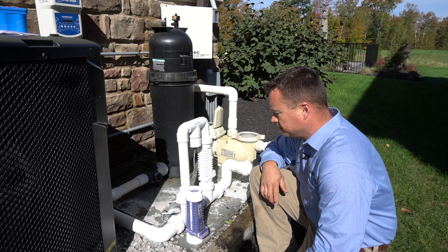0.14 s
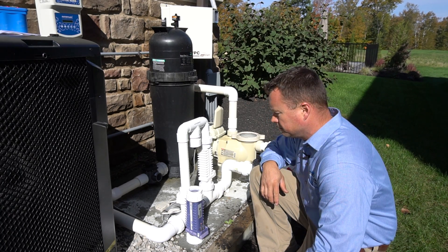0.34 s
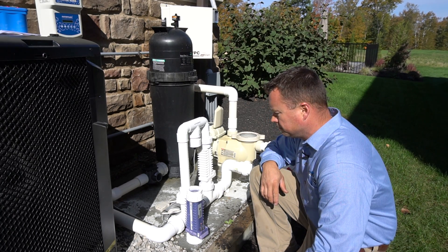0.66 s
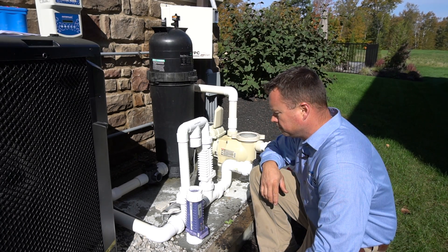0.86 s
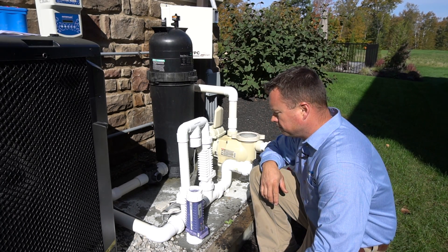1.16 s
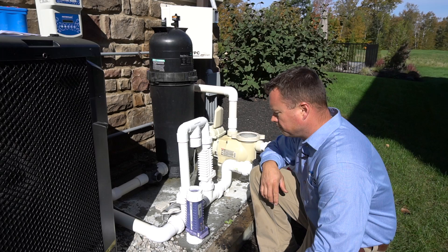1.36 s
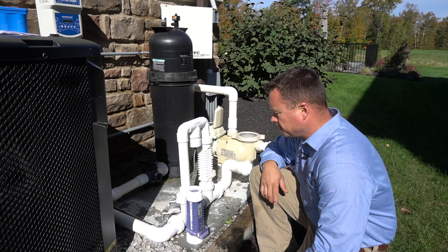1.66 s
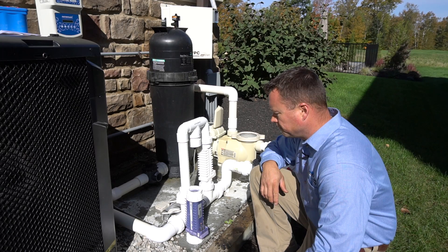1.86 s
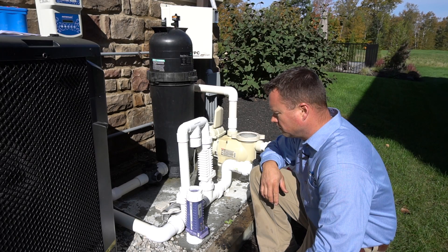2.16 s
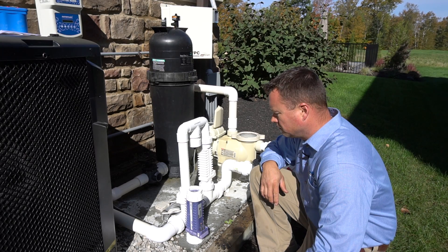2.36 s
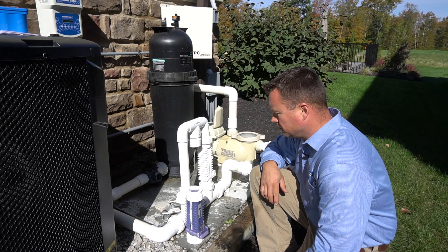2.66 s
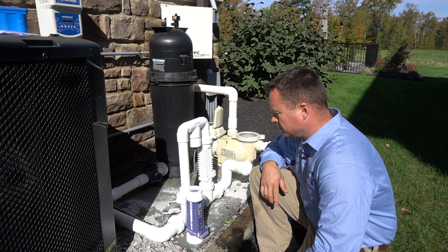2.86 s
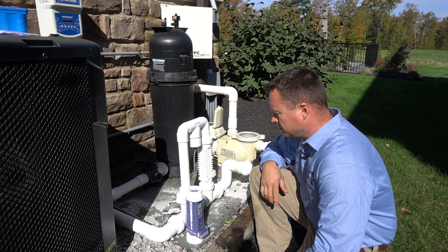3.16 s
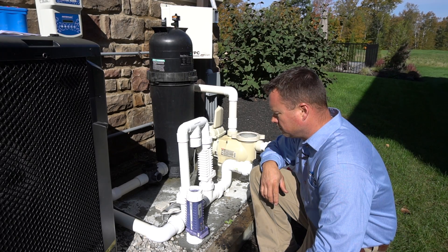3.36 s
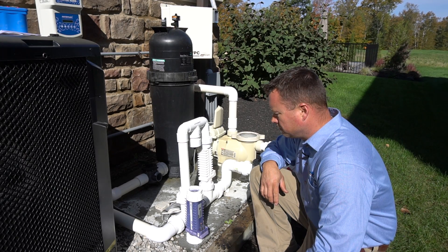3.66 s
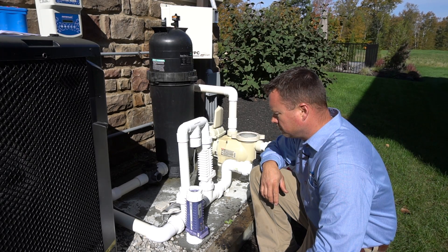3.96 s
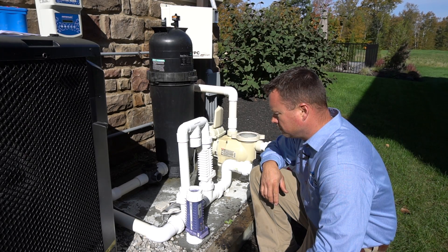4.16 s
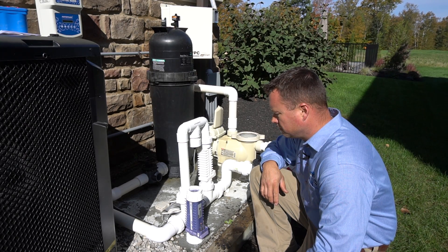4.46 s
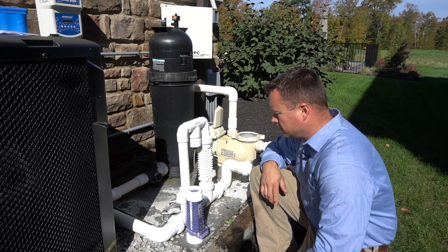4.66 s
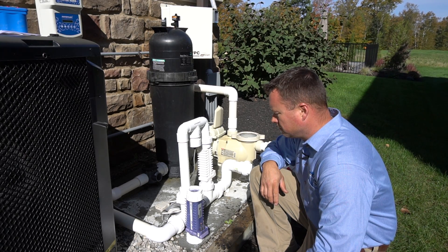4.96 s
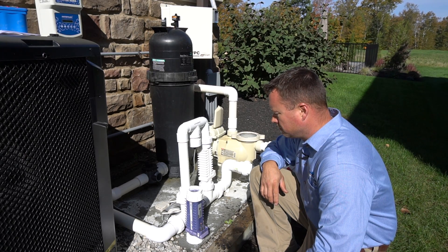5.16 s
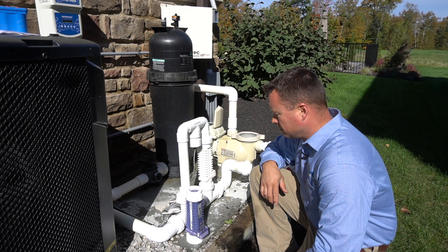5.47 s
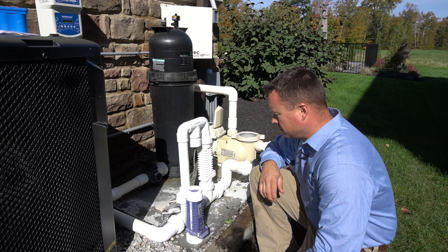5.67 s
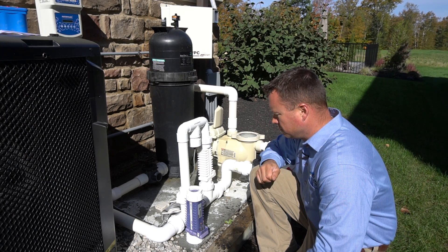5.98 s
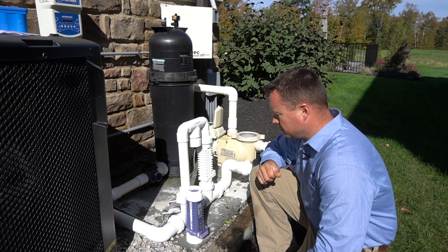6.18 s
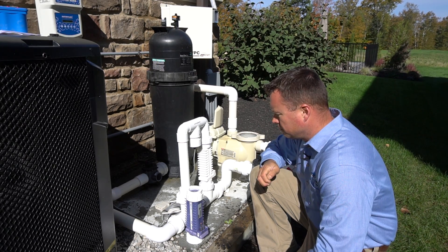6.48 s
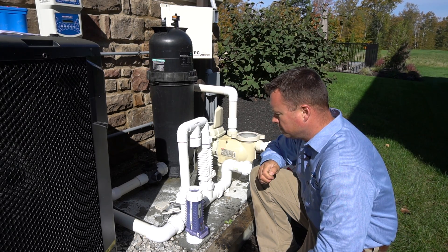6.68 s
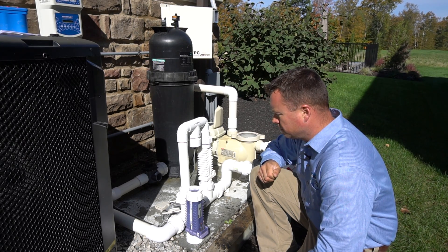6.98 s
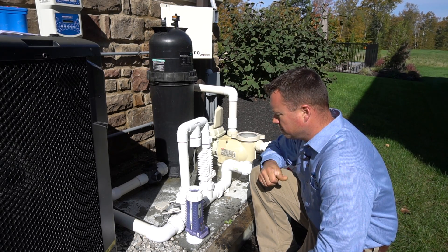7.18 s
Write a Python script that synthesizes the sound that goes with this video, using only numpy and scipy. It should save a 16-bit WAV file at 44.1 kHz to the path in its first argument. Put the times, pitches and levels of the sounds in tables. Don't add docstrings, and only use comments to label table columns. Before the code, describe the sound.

From 0 s a pool pump is already running outdoors beside a stone wall, fairly quiet at first. Its drone is steady in pitch: strong tones at about 290, 590 and 650 Hz, with higher whining overtones and a slight rough buzz from uneven rotation. Around them, turbulent water rushes with a hollow ring of housing and pipes, plus a fine continuous fizz of bubbles. A weak electrical hum lies below and a very faint, slowly wavering whistle near 14.5 kHz above. The level rises smoothly, about 1.5 dB per second, reaching roughly 11 dB louder near 7 s, then holding. Light wind makes low, muffled bumps on the microphone from about 1.5 s, clustered around 2.2-2.7, 3.3-4 and 4.7-5.9 s, milder near 6.5 s, strongest just after 7 s. The pump never starts, stops or changes speed.

```python
import sys
import numpy as np
from scipy import signal
from scipy.fft import rfft, irfft, next_fast_len
from scipy.io import wavfile
from scipy.ndimage import uniform_filter1d, map_coordinates

SR = 44100
rng = np.random.default_rng(int(sys.argv[2]) if len(sys.argv) > 2 else 0)


def transcribe(u):
    v = np.clip(np.atleast_2d(u).T, -1, 1)
    q = np.round(v * 32767).astype(np.int16)
    wavfile.write(sys.argv[1], SR, q)


def makeup_ratio(level_db):
    decades = np.asarray(level_db, float) / 20
    return 10 ** decades


N = 323253


def unit(x):
    return x / np.sqrt(np.mean(x ** 2) + 1e-20)


def along(points, hz):
    f, db = np.transpose(points)
    return makeup_ratio(np.interp(np.log(hz + 1), np.log(f + 1), db))


def wobble(rate):
    coarse = np.arange(0, N + 64, 64)
    knots = rng.standard_normal(int(N * rate / SR) + 4)
    curve = map_coordinates(knots, [coarse * rate / SR])
    return np.interp(np.arange(N), coarse, curve)


def swing(depth_db, period_s, crest_s):
    return depth_db * np.cos(2 * np.pi * (np.arange(N) / SR - crest_s) / period_s)


def coloured(x, gain):
    m = next_fast_len(N + 8192)
    spectrum = rfft(x, m) * gain(np.fft.rfftfreq(m, 1 / SR))
    return irfft(spectrum, m)[:N] * np.sqrt(SR / 2)


def patchy(patchy_db):
    z = signal.stft(rng.standard_normal(N + 512), nperseg=512)[2]
    field = uniform_filter1d(rng.standard_normal(z.shape), size=6, axis=0)
    field = uniform_filter1d(field, size=14, axis=1)
    noise = signal.istft(z * makeup_ratio(patchy_db * unit(field)), nperseg=512)[1]
    return unit(noise[:N])


def tones(angles, levels_db, sway_db, rate):
    total, n = np.zeros(N), np.arange(N)
    for angle, db in zip(angles, levels_db):
        level_db = db + sway_db * wobble(rate)
        envelope = np.interp(n, n[::64], makeup_ratio(level_db[::64]))
        total += envelope * np.sqrt(2) * np.sin(angle)
    return total


def wind():
    # (start of hold [s], peak level [dB], hold [s])
    gust_events = [(1.55, -54, .15), (2.25, -47, .06), (2.69, -46, .04), (2.9, -57, .05), (3.33, -47, .06),
                   (3.77, -46, .03), (3.96, -44, .06), (4.75, -47, .1), (4.98, -45.5, .05),
                   (5.27, -44, .05), (5.45, -49, .12), (5.702, -46, 0.18), (6.43, -50, 0.11),
                   (6.7, -52, 0.14), (7.07, -42, .17)]
    # (frequency [Hz], level [dB])
    buffet_colour = [(4, -30), (12, -8), (22, -3.5), (40, 0.5), (65, -4.5), (90, -8), (200, -24),
                     (500, -60)]
    breeze_db = -56
    rise_s, fall_s = 0.041, 0.073
    t = np.arange(N) / SR
    strength = makeup_ratio(breeze_db)
    for start, db, hold in gust_events:
        rise = (t - start) / rise_s
        fall = (start + hold - t) / fall_s
        strength = strength + makeup_ratio(db) * np.exp(np.minimum(0, np.minimum(rise, fall)))
    buffeting = coloured(rng.standard_normal(N), lambda f: along(buffet_colour, f))
    return strength * unit(makeup_ratio(1.4 * wobble(8)) * buffeting)


def drive():
    # (frequency [Hz], rms level [dB])
    hum_tones = [
        (35, -58),
        (94.2, -60),
        (120.5, -60),
        (58.7, -62),
    ]
    # (offset from carrier [ripple steps], rms level [dB])
    whistle_lines = [(-13.63, -88), (-5.35, -90), (-5, -89), (-3, -91), (-1.48, -94), (0, -78), (1, -81),
                     (3, -84), (5, -90), (6, -92), (7.35, -94)]
    # (offset [ripple steps], rms level [dB], swing [dB], period [s], crest [s])
    beat_lines = [
        (-4, -80, 1.5, 13, 6),
        (-2, -82, 8, 4.9, .1),
        (-1, -89, 7, 13, 6.3),
        (2, -76, 2.5, 5.5, 1.5),
    ]
    carrier_hz, ripple_hz = 14494.1, 120.6
    t = 2 * np.pi * np.arange(N) / SR

    def sideband(k):
        return (carrier_hz + k * ripple_hz) * t + rng.uniform(0, 2 * np.pi)

    hum = tones((hz * t for hz, _ in hum_tones), [db for _, db in hum_tones], sway_db=3.0, rate=2.47)
    steady = tones((sideband(k) for k, _ in whistle_lines), [db for _, db in whistle_lines],
                   sway_db=1.2, rate=.9)
    beating_db = [db + swing(*beat) for _, db, *beat in beat_lines]
    beating = tones((sideband(round(row[0])) for row in beat_lines), beating_db, sway_db=2.0, rate=3.04)
    return hum + steady + beating


def water():
    # (frequency [Hz], width [Hz], density [dB per Hz])
    housing_modes = [(250, 60, -72), (353, 68, -66), (531, 124, -63.5), (632, 55, -69), (811.5, 105, -61),
                     (927, 110, -69.5), (1050, 50, -66.5), (1226, 58, -64), (1280, 65, -68),
                     (1530, 29, -73), (1748, 110, -72), (1890, 58, -78), (1940, 63, -69), (2043, 140, -74),
                     (2420, 450, -81.5), (3035, 126, -82.5), (3450, 88, -82.5), (3566, 57, -83.5),
                     (3800, 82, -90.5), (4430, 150, -89), (5210, 140, -91), (5460, 100, -93),
                     (6180, 150, -95.5), (6400, 150, -94), (7510, 30, -96), (7740, 90, -92),
                     (8200, 350, -99), (8700, 60, -91.5), (8800, 40, -95), (11000, 80, -102)]
    # (frequency [Hz], density [dB per Hz])
    rush_colour = [(15, -100), (60, -73), (200, -70), (700, -70), (1500, -73.5), (2300, -78), (3000, -87),
                   (4500, -87), (7000, -96), (10000, -97), (13000, -104), (14000, -107), (16000, -109)]
    # (frequency [Hz], density [dB per Hz])
    fizz_colour = [(1500, -38), (3000, -2), (5000, -1), (9000, -5), (13000, -18.5), (16000, -14)]

    def ring_power(f):
        return sum(makeup_ratio(db) ** 2 / (1 + (2 * (f - hz) / width) ** 4) for hz, width, db in housing_modes)

    flow = coloured(patchy(patchy_db=.3), lambda f: np.sqrt(along(rush_colour, f) ** 2 + ring_power(f)))
    pops_per_s = 1100 * makeup_ratio(3 * wobble(25))
    pops = (rng.random(N) < pops_per_s / SR) * rng.standard_normal(N)
    fizz = unit(coloured(pops, lambda f: along(fizz_colour, f)))
    return flow + makeup_ratio(-60.5) * fizz


def rotor():
    # (multiple of shaft speed, rms level [dB])
    vane_tones = [(5, -39), (10, -37), (15, -42), (25, -55), (30, -47), (35, -60), (40, -59), (45, -56),
                  (50, -74), (65, -70), (70, -81), (85, -79), (90, -77), (95, -84), (100, -79)]
    # (multiple of shaft speed, rms level [dB], drift [dB], period [s], crest [s])
    blade_tones = [
        (11, -40.1, 1.4, 5.2, 2.1),
        (22, -45.7, 1.4, 4.8, .4),
        (33, -57, .5, 5, 1),
    ]
    # (multiple of shaft speed, rms level [dB])
    uneven_tones = [(6, -56), (7, -63), (9, -57), (12, -63), (14, -53), (19, -61), (21, -54), (23, -59),
                    (26, -54), (27, -66), (28, -61), (29, -55), (31, -49), (32, -66), (34, -61), (36, -70),
                    (39, -72), (43, -74), (46, -70), (47, -73), (51, -68), (52, -73), (53, -78), (56, -80),
                    (58, -75), (61, -74), (62, -78), (63, -81)]
    shaft_hz = 58.7
    uneven_lag = 1 / 6
    housing_lag = 1 / 7
    shaft = 2 * np.pi * shaft_hz * np.arange(N) / SR + 0.017 * wobble(1.184) + 0.0057 * wobble(5)

    def lift_db(k):
        return k / 50 * (k > 10)

    def lead(k):
        if k in (5, 11):
            return np.pi / 2
        return .2 - 2 * np.pi * housing_lag * (k == 15)

    pulsed = vane_tones + [(k, db + swing(*drift)) for k, db, *drift in blade_tones]
    steady = tones((k * shaft + lead(k) for k, _ in pulsed), [db + lift_db(k) for k, db in pulsed],
                   sway_db=.15, rate=1.5)
    loose_angles = (k * shaft - 2 * np.pi * (uneven_lag + (k + 1) % 2 / 2) for k, _ in uneven_tones)
    loose = tones(loose_angles, [db + lift_db(k) for k, db in uneven_tones], sway_db=0.2, rate=1.36)
    return steady + loose


def scene():
    return (wind() + drive() + water() + rotor())[None]


def top_cut(x):
    return signal.sosfilt(signal.butter(12, 15650, fs=SR, output="sos"), x)


def record(dry):
    open_db_per_s, open_top_db = 1.53, 11.3
    gain_db = np.minimum(open_db_per_s * np.arange(N) / SR, open_top_db)
    return top_cut(dry * makeup_ratio(gain_db))


dry = scene()
out = record(dry)
transcribe(out)
```